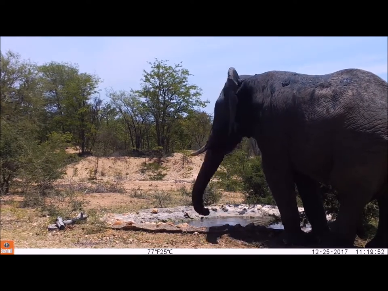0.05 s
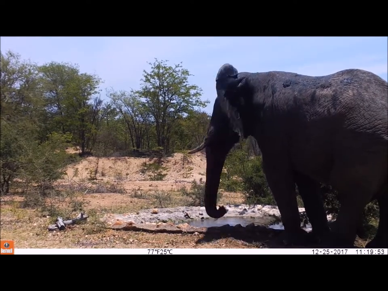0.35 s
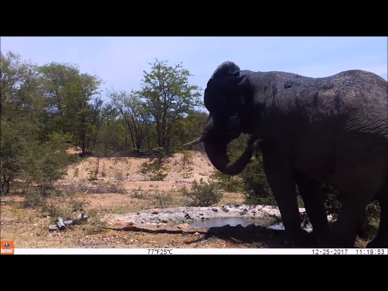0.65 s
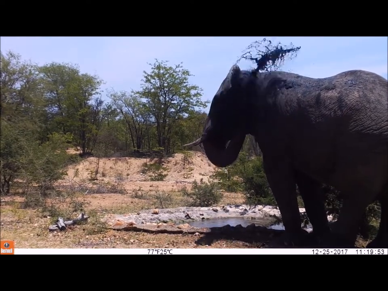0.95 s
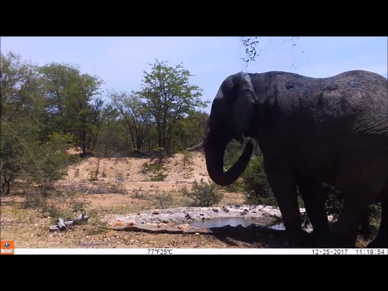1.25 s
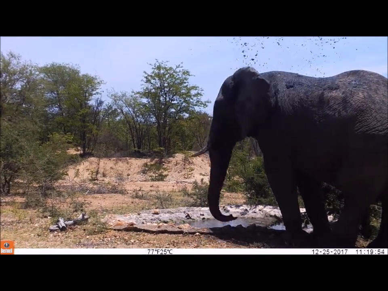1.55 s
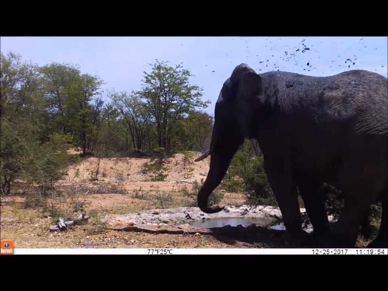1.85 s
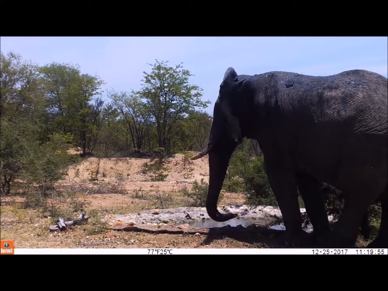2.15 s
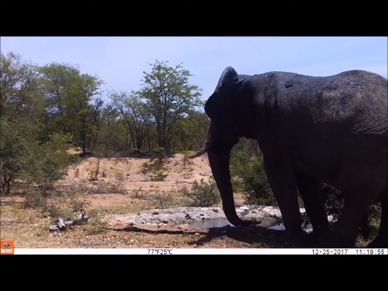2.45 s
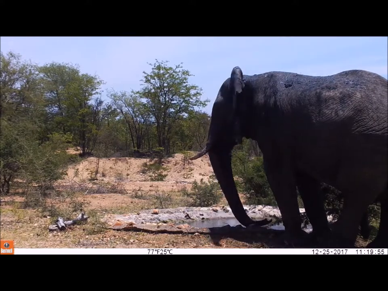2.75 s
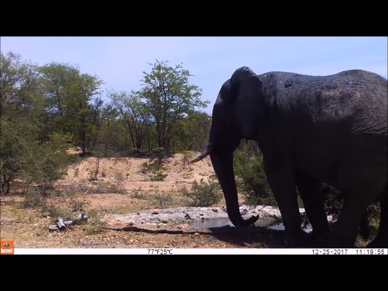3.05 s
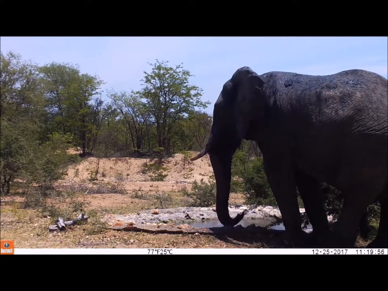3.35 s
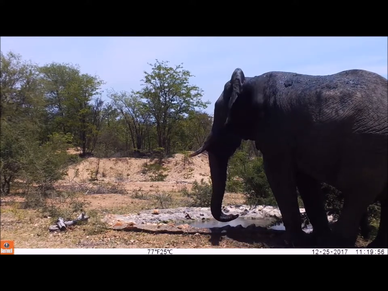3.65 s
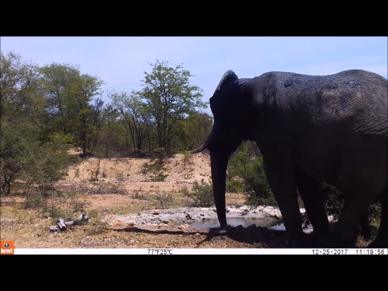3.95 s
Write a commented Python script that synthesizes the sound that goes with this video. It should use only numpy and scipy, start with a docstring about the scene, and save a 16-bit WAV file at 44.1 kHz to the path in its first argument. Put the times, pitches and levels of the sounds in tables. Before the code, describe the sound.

Mud hisses from an elephant's trunk and splatters on dry ground, with wind on the microphone.

```python
"""An elephant at a waterhole swings its trunk and blows a load of mud over its back.
The spray hisses out over the hollow ring of the trunk; a second later drops and clods patter down on dry ground.
Wind rumbles on the microphone throughout and ends in a hard gust."""
import sys
import numpy as np
from scipy import signal
from scipy.fft import rfft, irfft
from scipy.io import wavfile
from scipy.ndimage import uniform_filter1d

SR = 44100
rng = np.random.default_rng(int(sys.argv[2]) if len(sys.argv) > 2 else 0)


def output_pcm(signal):
    """Save a mono or channel-first signal as 16-bit PCM at the path in sys.argv[1].

    Samples are clipped to [-1, 1] before scaling.
    """
    pcm = np.clip(np.atleast_2d(signal).T, -1, 1) * 32767
    wavfile.write(sys.argv[1], SR, np.round(pcm).astype(np.int16))


N = 176400

# Mud spray leaving the trunk (s, level dB)
SPRAY = [(.75, -72), (.778, -46.5), (.845, -40), (.885, -45.5), (.94, -51), (1.06, -45.5), (1.125, -41), (1.205, -39.5), (1.25, -46), (1.32, -45), (1.37, -54), (1.45, -77)]
SPRAY_COLOUR = [(820, -26), (1400, -35), (1840, -2.5), (2110, -18), (2530, -10.5), (2720, -7.5), (3160, -8), (3990, -2.5),
                (6530, 3), (7510, -6.5), (9660, -10), (13600, -30.5), (15500, -33)]  # (Hz, dB per Hz)
# Low rush of the swing (s, level dB), and its colour (Hz, dB per Hz)
SWING = [(.77, -62), (.85, -51.5), (.91, -60), (1.04, -55), (1.2, -53.5), (1.4, -67)]
SWING_COLOUR = [(150, -7), (320, 3), (650, 1), (900, -7), (1200, 1), (2600, 0), (4000, -25)]
# Air through the trunk (s, level dB), and its resonances (Hz, width Hz, dB)
BLOW = [(.92, -68), (1.04, -54), (1.14, -51.5), (1.28, -55.5), (1.36, -57.5), (1.42, -65)]
TRUNK = [(590, 160, 1), (740, 79, -0.5), (1065, 55, -3.5), (1220, 90, 2), (1900, 290, -26), (2780, 87, -18)]
# Fine mud and grit landing: a trickle, then the shower (s, level dB)
SHOWER = [(0, -62), (.12, -70.5), (.3, -64), (.36, -62), (.43, -67), (.62, -58.5), (1.35, -60.5), (1.52, -55.5), (1.7, -52.5), (1.755, -52), (1.8, -51.5), (1.84, -52), (1.89, -55), (2.03, -55.5), (2.2, -48.5), (2.275, -49.5), (2.32, -44), (2.44, -47.5), (2.48, -47), (2.52, -46), (2.58, -46.5), (2.64, -52), (2.8, -63), (3.04, -63), (3.42, -67.5), (3.57, -61.5), (3.75, -67), (4, -61.5)]
SHOWER_COLOUR = [(530, -43), (900, -27.5), (1100, -5.5), (1320, -16), (1930, -7), (2310, -11), (4230, -2.5), (4940, -0.5),
                 (6120, 2.5), (7960, -6.5), (9740, -8), (12700, -24.5), (15500, -40)]  # (Hz, dB per Hz)
# Heavier wet mud within the shower (s, level dB), and its colour (Hz, dB per Hz)
WET = [(2.05, -83), (2.27, -60), (2.33, -51), (2.39, -53.5), (2.445, -51), (2.48, -59), (2.52, -44.5), (2.6, -68), (2.75, -69)]
WET_COLOUR = [(250, -26), (600, -7), (1100, -0.5), (1450, -7), (1850, 3), (2800, -7), (4300, 4), (7000, -26)]
# Single drops on leaves and hard ground (s, peak dB, pitch Hz, scatter after the hit dB)
DROPS = [(0.784, -31, 4600, -7), (.971, -30, 5500, -17), (1.010, -26, 6230, -14), (1.215, -25.5, 6000, -18), (1.4783, -33.5, 4400, -11), (1.574, -34.5, 6100, -2.5), (1.633, -51, 5500, -15), (1.724, -34.5, 6100, -9), (1.7397, -23.5, 5430, -12), (1.747, -29, 6100, -7), (1.761, -23, 5460, -32), (1.791, -32, 4600, -8), (1.823, -30.5, 7200, -4), (1.901, -41, 2860, -6), (1.9458, -28, 6050, -22), (2.0299, -23.5, 5920, -27), (2.096, -33, 3600, -4.5), (2.198, -37, 7800, 7.5), (2.257, -30.5, 6500, -17), (2.282, -23.5, 5500, -10), (2.318, -30, 4400, -1), (2.3985, -28, 7000, -19), (2.4205, -35.5, 4530, 0), (2.4409, -23.5, 4740, -21), (2.548, -33.5, 4600, -2), (2.68, -38.5, 4500, -5), (2.906, -47, 4760, -12), (3.026, -38.5, 6800, -15), (3.18, -49, 4540, -17), (3.289, -40.5, 5870, -9), (3.8197, -38.5, 4200, -11), (3.876, -42, 4470, -16), (3.9, -38, 4340, -20), (3.99, -41, 6000, -12)]
# Soft clods slapping down (s, peak dB, pitch Hz, decay s, width as a share of pitch)
CLODS = [(1.7406, -45, 2200, .001, 0.71), (1.7612, -43.5, 2400, 0.00066, 1), (2.0305, -30.5, 2600, 0.00038, 1), (2.3532, -25.5, 1360, 0.00025, 0.96), (2.355, -41, 810, 0.0029, 0.95), (2.419, -32, 1910, .002, 0.4), (2.4418, -31.5, 1820, 0.0023, 0.25), (2.4425, -34.5, 870, 0.0013, 0.7)]
# Wind on the microphone (s, level dB)
WIND = [(0, -38.5), (.17, -51), (.4, -43), (.7, -40.5), (.84, -34.5), (1.04, -35.5), (1.09, -39.5), (1.3, -46), (1.45, -38.5), (1.62, -35.5), (1.76, -42), (1.95, -36.5), (2.4, -43), (2.52, -48.5), (2.85, -51), (3.05, -51.5), (3.5, -53), (3.7, -39), (3.81, -33.5), (4, -38.5)]
WIND_COLOUR = [(8.8, -48), (15, 1.5), (38, 2.5), (79, 1.5), (432, -30.5), (559, -41.5), (700, -44.5), (910, -62), (1540, -120)]  # (Hz, dB per Hz)
# Turbulence of the last gust (s, level dB), and its colour (Hz, dB per Hz)
GUST = [(3.64, -93), (3.79, -46), (3.845, -40), (3.865, -34.5), (3.905, -32.5), (3.937, -38), (3.95, -33), (4, -38.5)]
GUST_COLOUR = [(50, -27), (130, 3.5), (240, 0.5), (380, -7), (500, -6.5), (850, -14.5), (1400, -22), (2100, -33.5), (3200, -47), (6000, -65)]
GUST_DARKEN = 0.93  # treble lost per octave above 400 Hz, in dB for each dB that the gust drops
# Still air and microphone hiss (Hz, dB per Hz)
FLOOR = [(120, -28.5), (200, -2.5), (423, -6.5), (832, -8), (1020, -12), (1290, -11.5), (1900, -13), (3400, -13),
         (5890, -13.5), (8640, -17), (14700, -16.5), (15800, -18)]
FLOOR_DB = -61.5
BUSH_DB, BUSH_DECAY_S = -13, 0.01
EDGE_HZ = 15900  # fixed
CLOD_WIDTH = None
CLOD_SCATTER_DB = -13
# Single wind eddies on the microphone (s, peak dB, pitch Hz)
BUFFETS = [(.37, -31.5, 64.4), (0.494, -28.5, 66), (.725, -32, 91), (0.836, -32, 88.4), (1.027, -26, 75.6), (1.615, -29, 76), (1.864, -31.5, 109), (2.144, -29.5, 61), (2.392, -34, 46.3), (3.814, -19.5, 86)]
BUFFET_CYCLES = 0.58
DROP_WIDTH = 0.52
DROP_RING_S = 0.00097
SCATTER_S = 0.0062
DROP_SKIRT = 3.3
# Wet gulps as the trunk empties (s, peak dB, pitch Hz, half length s)
GULPS = [(0.967, -49, 1020, 0.013), (1.112, -42, 1916, 0.0053)]
DROP_PING_DB, DROP_PING_S = -11, 0.0019
GRAINS_PER_S, WASH_SHARE = 2600, 0.53
GRAIN_SPREAD_DB = 2.5  # fixed
GULP_FROTH_DB = -3.5


def amp(db):
    return 10 ** (np.asarray(db) / 20)


def unit(x):
    """Scales to rms 1."""
    return x / np.sqrt(np.mean(x ** 2) + 1e-20)


def level(curve):
    """Gain over time from (s, dB) points, silent outside them."""
    return amp(np.interp(np.arange(N) / SR, *np.transpose(curve), left=-140, right=-140))  # fixed


def add(mix, s, sound):
    """Mixes a sound in at time s."""
    part = mix[max(round(s * SR), 0):][:len(sound)]
    part += sound[:len(part)]


def coloured(x, points):
    """Causal filter through (Hz, dB) points; rms 1."""
    hz, db = np.transpose(points)
    log_gain = np.log(amp(np.interp(np.log(abs(np.fft.fftfreq(N, 1 / SR)) + 1), np.log(hz + 1), db)))
    return unit(np.fft.ifft(np.fft.fft(x) * np.exp(np.conj(signal.hilbert(log_gain)))).real)


def noise():
    return rng.standard_normal(N)


def flutter(rate_hz, depth_db):
    """A randomly wandering gain."""
    slow = irfft(rfft(noise()) * np.exp(-(np.fft.rfftfreq(N, 1 / SR) / rate_hz) ** 2), N)
    return unit(amp(depth_db * unit(slow)))


def grains(per_s, spread_db, wash):
    """Random clicks of uneven size, with a share of smooth noise from those too small to tell apart."""
    clicks = noise() * amp(spread_db * np.minimum(rng.exponential(1, N), 3)) * (rng.random(N) < per_s / SR)
    wash = np.clip(wash, 0, 1)
    return np.sqrt(1 - wash) * unit(clicks) + np.sqrt(wash) * noise()


def ring(x, hz, width_hz):
    """One resonance."""
    return signal.lfilter(*signal.iirpeak(min(hz, SR / 3), hz / min(width_hz, SR / 4), SR), x)


def impact(hz, width, decay_s, scatter_db):
    """A sharp blow and a short crush, then scattering bits, ringing around one pitch; peak 1."""
    t = np.arange(2048) / SR
    crush, bits = rng.standard_normal((2, len(t)))
    blow = np.sign(crush) * np.exp(-t / decay_s)
    blow[0] += 2
    blow, bits = ring(blow, hz, hz * width), unit(ring(bits, hz, hz * width))
    return blow / abs(blow).max() + amp(scatter_db) * bits * np.exp(-t / SCATTER_S) * (1 - np.exp(-t / .001)) / 2


def fling():
    """Mud and air hiss out of the trunk, which rings like a pipe."""
    spray = coloured(sputter(grains(8200, 1.7, wash=0.77), depth_db=1.3), SPRAY_COLOUR) * level(SPRAY) * flutter(rate_hz=36, depth_db=0.3)
    swing = coloured(noise(), SWING_COLOUR) * level(SWING)
    pipe = sum(amp(db) * unit(ring(ring(noise(), hz, 1.3 * w), hz, 1.3 * w)) * flutter(rate_hz=12, depth_db=4.0) for hz, w, db in TRUNK)
    return spray + swing + unit(pipe) * level(BLOW)


def shower():
    """Fine mud patters down in clumps, with wetter lumps at its height."""
    fine = coloured(sputter(grains(GRAINS_PER_S, GRAIN_SPREAD_DB, WASH_SHARE), depth_db=2.5), SHOWER_COLOUR)
    wet = coloured(sputter(grains(900, 6.2, wash=0.13), depth_db=4), WET_COLOUR)
    return fine * level(SHOWER) * flutter(rate_hz=70, depth_db=1.9) + wet * level(WET)


def drops():
    """The nearest drops tick with a very short ping, and the clods slap."""
    ticks, slaps = np.zeros((2, N))
    t = np.arange(512) / SR
    for s, db, hz, scatter_db in DROPS:
        add(ticks, s, amp(db) * ring(impact(hz, DROP_WIDTH, DROP_RING_S, scatter_db), hz, hz * DROP_SKIRT))
        add(ticks, s, amp(db + DROP_PING_DB) * np.sin(2 * np.pi * hz * t) * np.exp(-t / DROP_PING_S))
    for s, db, hz, decay_s, width in CLODS:
        add(slaps, s, amp(db) * impact(hz, width, decay_s, CLOD_SCATTER_DB))
    return softened(ticks, edge_hz=7750) + softened(slaps, edge_hz=3000)


def softened(x, edge_hz):
    """Rolls off the top."""
    return signal.sosfilt(signal.butter(3, min(edge_hz, SR / 3), fs=SR, output="sos"), x)


def wind():
    """Lumpy rumble, and a gust whose turbulence brightens as it grows."""
    rumble = coloured(noise(), WIND_COLOUR) * level(WIND) * flutter(rate_hz=5.6, depth_db=2.0)
    force = level(GUST) * flutter(rate_hz=140, depth_db=2.1)
    hz, t, z = signal.stft(coloured(noise(), GUST_COLOUR) * force, SR, nperseg=256)
    lull_db = np.clip(20 * np.log10(force[np.minimum((t * SR).astype(int), N - 1)] / level(GUST).max()) + 3.5, -15, 3)
    z = z * amp(GUST_DARKEN * np.log2(np.maximum(hz / 400, 1))[:, None] * lull_db)
    return rumble + signal.istft(z, SR, nperseg=256)[1][:N]


def bush(x):
    """Faint, short scatter from the ground and shrubs."""
    t = np.arange(SR // 4) / SR
    tail = rng.standard_normal(len(t)) * np.exp(-t / BUSH_DECAY_S) * (t > .003)
    return amp(BUSH_DB) * signal.fftconvolve(x, tail / np.linalg.norm(tail))[:N]


def buffets():
    """Single eddies thump the microphone, about one cycle each."""
    t = np.arange(N) / SR
    return sum(amp(db) * np.exp(-((t - s) * hz / BUFFET_CYCLES) ** 2) * np.cos(2 * np.pi * (hz * (t - s) + rng.random())) for s, db, hz in BUFFETS)


def gulps():
    """Pockets of air pop in the mud: a brief pitch with some froth around it."""
    t = np.arange(N) / SR
    return sum(amp(db) * np.exp(-((t - s) / length) ** 2) * (np.sin(2 * np.pi * hz * t) + amp(GULP_FROTH_DB) * unit(ring(noise(), hz, hz / 4))) for s, db, hz, length in GULPS)


def sputter(x, depth_db):
    """Random patches in time and pitch, as lumps of different sizes go by."""
    z = signal.stft(x, SR, nperseg=256, noverlap=192)[2]
    patches = uniform_filter1d(uniform_filter1d(rng.standard_normal(z.shape), size=4, axis=0), size=9, axis=1)
    return unit(signal.istft(z * amp(depth_db * unit(patches)), SR, nperseg=256, noverlap=192)[1][:N])


def scene():
    """Mud, its scatter, wind and still air."""
    mud = fling() + gulps() + shower() + drops()
    return (mud + bush(mud) + wind() + buffets() + amp(FLOOR_DB) * coloured(noise(), FLOOR))[None]


def record(dry):
    """The band limit."""
    return signal.oaconvolve(dry, signal.firwin(511, EDGE_HZ, window=("kaiser", 9), fs=SR)[None], "same")


dry = scene()
out = record(dry)
output_pcm(out)
```